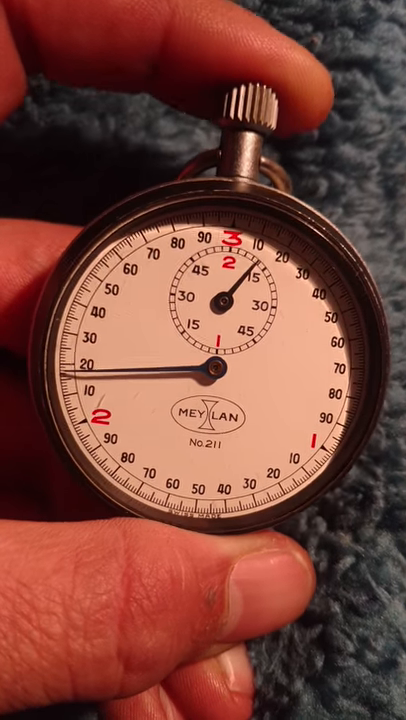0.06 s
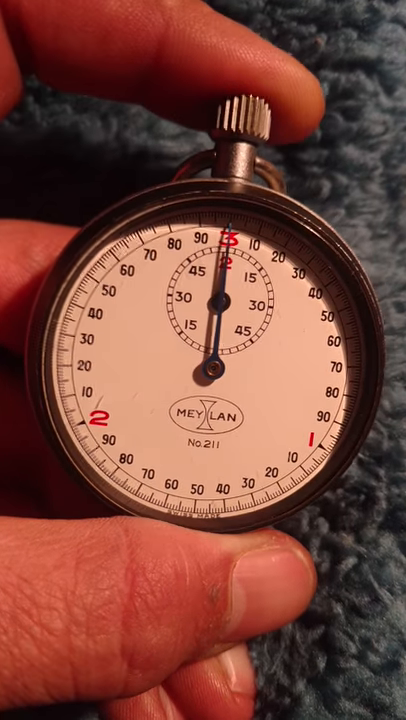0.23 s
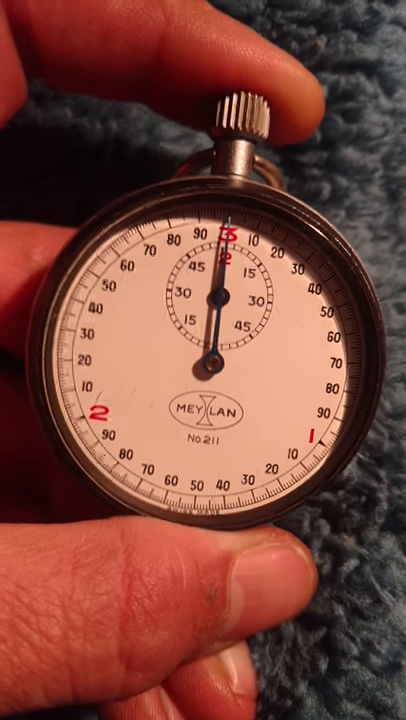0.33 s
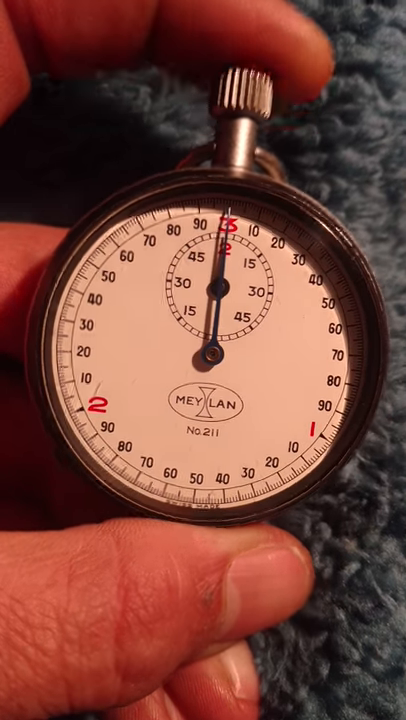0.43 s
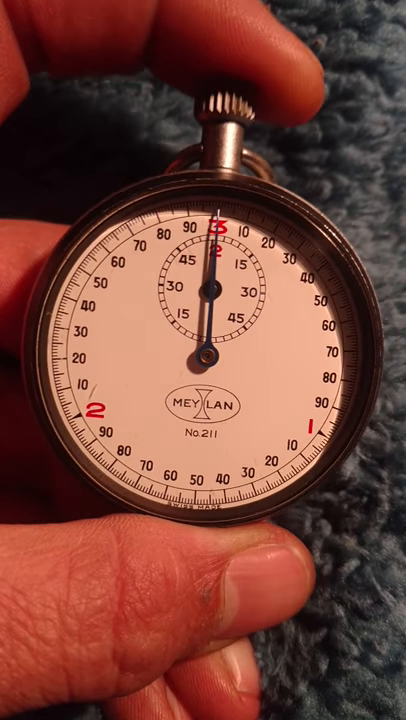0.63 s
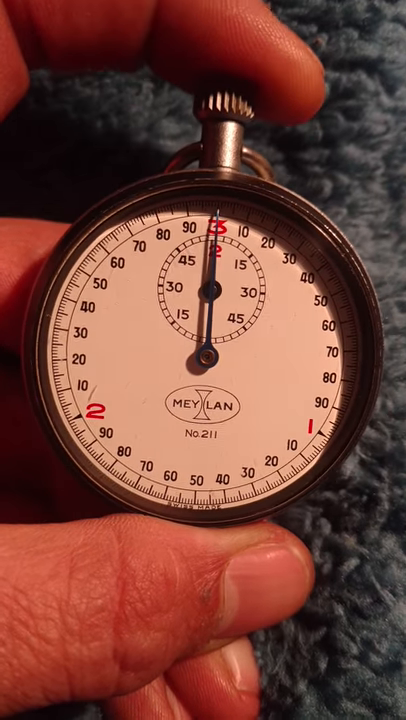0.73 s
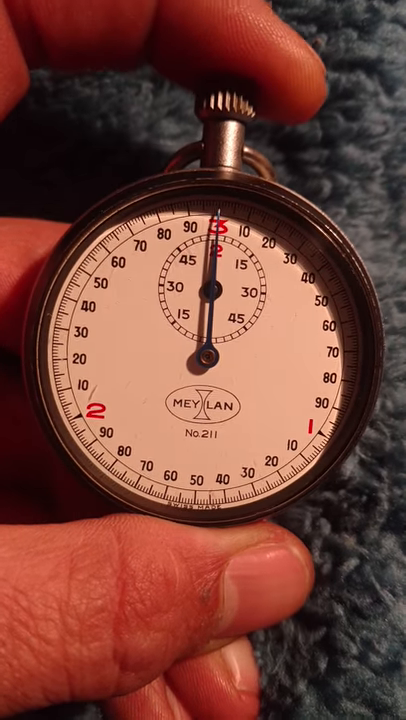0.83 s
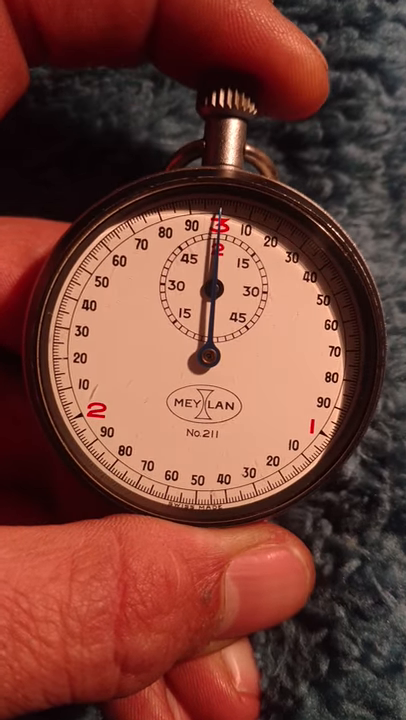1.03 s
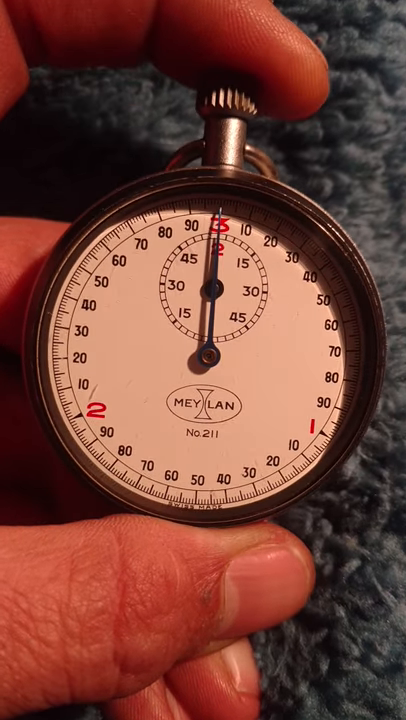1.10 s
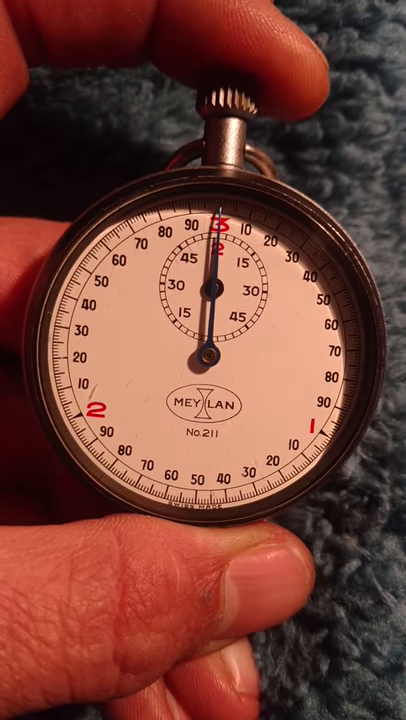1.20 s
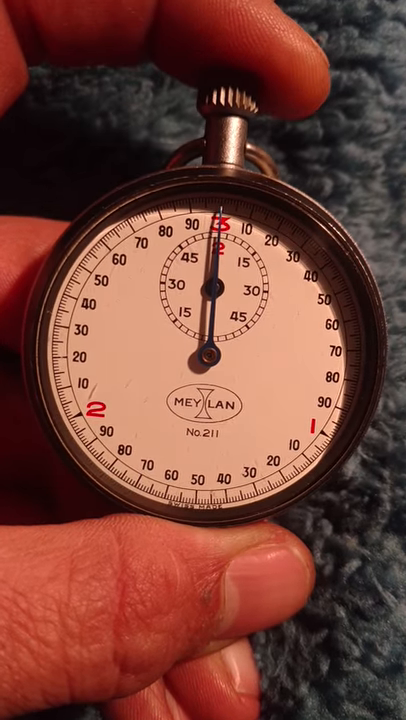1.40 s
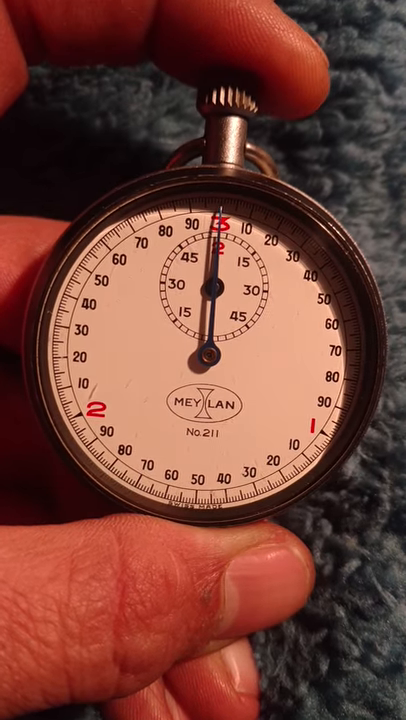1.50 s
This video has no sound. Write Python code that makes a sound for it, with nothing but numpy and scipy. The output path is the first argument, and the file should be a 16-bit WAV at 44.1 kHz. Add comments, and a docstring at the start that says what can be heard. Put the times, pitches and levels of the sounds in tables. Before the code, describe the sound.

A mechanical stopwatch resets with one sharp metallic snap, then two weaker clicks.

```python
"""Resetting a stopwatch

A fan runs in a small room. Close to a phone, a finger presses a stopwatch's crown, which takes up its
play; the hammer snaps the hands to zero, then the crown and its lever click back. Each impact excites
the damped normal modes of the steel case. The snap pulls the phone's automatic gain down, and the
room tone creeps back up."""
import sys
import numpy as np
from scipy import signal
from scipy.fft import rfft, irfft
from scipy.io import wavfile
from scipy.ndimage import uniform_filter1d

SR = 44100
rng = np.random.default_rng(int(sys.argv[2]) if len(sys.argv) > 2 else 0)


def dump_mix(stems):
    """Bounce the given channels to the path in sys.argv[1] as a 16-bit WAV at rate SR."""
    frames = np.atleast_2d(stems).T  # one column per channel
    limited = np.clip(frames, -1, 1)  # hard clip at full scale
    pcm = np.round(limited * 32767).astype(np.int16)
    wavfile.write(sys.argv[1], SR, pcm)


N = 68355
FREQS = np.fft.rfftfreq(N, 1 / SR)


def undb(db):
    """Amplitude ratio of a level in decibels."""
    return 10 ** (np.asarray(db) / 20)


def curve(points):
    """Magnitude response through (f/Hz, level/dB) points, interpolated in log frequency."""
    hz, db = np.array(points, float).T
    return undb(np.interp(np.log(FREQS + 1), np.log(hz), db))


def tint(x, points):
    """Zero-phase filtering by a magnitude response."""
    return irfft(rfft(x) * curve(points), N)


def unit(x):
    """Normalisation to unit rms."""
    return x / np.sqrt(np.mean(x ** 2))


def noise(spectrum):
    """Spectrally shaped Gaussian noise of unit rms."""
    return unit(tint(rng.standard_normal(N), spectrum))


def decay(age, t60):
    """Exponential damping from age 0, by 60 dB in t60 seconds."""
    return (age >= 0) * np.exp(-np.log(1000) * np.maximum(age, 0) / t60)


def widen(x, share=0.61, delay_s=0.000389, corner_hz=1410):
    """Antiphase crossfeed: each channel loses a delayed copy of the other's treble."""
    highpass = 1 - np.exp(-(FREQS / corner_hz) ** 2)
    crossfeed = share * np.exp(-2j * np.pi * FREQS * delay_s) * highpass
    return x - irfft(rfft(x[::-1]) * crossfeed, N)


def diffuse(spectrum, side_gain):
    """Partial coherence: independent mid and side noises form a widened stereo pair."""
    mid, side = (irfft(rfft(noise(spectrum)) * gain / np.hypot(1, side_gain), N)
                 for gain in (1, side_gain))
    return unit(widen(np.array([mid + side, mid - side])))


# Airflow spectrum: f/Hz, relative level/dB
AIR_SPECTRUM = [(25, -30.5), (65, -13), (110, -6), (200, -1), (350, -6.5), (620, -6), (790, 1), (900, -4),
                (1080, -1.5), (1400, -11.5), (1750, -6), (2400, -20), (3500, -25.5), (7000, -31),
                (15000, -43.5)]
# Side-to-mid ratio of the airflow: f/Hz, level/dB
AIR_SIDE_RATIO = [(40, 5), (110, 0), (400, -7), (700, -11.5), (1200, -18.5), (1700, 6.5), (3000, 1.5)]
# Blade tones: harmonic number, rms level/dB
BLADE_HARMONICS = [(1, -66.5), (2, -71.5), (3, -73.5), (4, -66), (5, -61.5), (6, -69.5), (7, -75),
                   (8, -67.5), (10, -67)]

def fan(t, blade_hz=98, waver_depth=0.002, mains_hz=120.3):
    """Harmonics of a wavering blade-passing frequency add to mains hum and broadband airflow noise."""
    waver = unit(irfft(rfft(rng.standard_normal(N)) * np.exp(-FREQS / 5), N))
    cycles = np.cumsum(blade_hz * (1 + waver_depth * waver)) / SR
    blades = sum(undb(db) * np.sin(2 * np.pi * (k * cycles + rng.random())) for k, db in BLADE_HARMONICS)
    hum = undb(-62.5) * np.sin(2 * np.pi * mains_hz * t)
    air = undb(-51) * diffuse(AIR_SPECTRUM, curve(AIR_SIDE_RATIO))
    return np.sqrt(2) * (blades + hum) + air


# Skin friction spectrum: f/Hz, relative level/dB
RUB_SPECTRUM = [(3000, -16), (7000, -1), (10000, 5), (12500, -7), (14000, -1), (15500, -25)]
# Handling rumble spectrum: f/Hz, relative level/dB
RUMBLE_SPECTRUM = [(25, 5), (55, 11), (90, 9), (200, -25), (600, -52)]

def finger(t, press_s=0.067, press_width_s=0.067, release_s=0.465):
    """Friction of skin on the knurled crown hisses faintly; letting go sets off a damped rumble."""
    rumble = decay(t - release_s, t60=0.18) * np.array([noise(RUMBLE_SPECTRUM) for _ in range(2)])
    pressure = np.exp(-((t - press_s) / press_width_s) ** 2)
    rub = pressure * diffuse(RUB_SPECTRUM, side_gain=0.76)
    return undb(-72) * rub + undb(-55.5) * rumble


# Modes of case and movement: f/Hz, level/dB when struck by hammer, by crown, by lever, T60/s
CASE_MODES = [(519, -14.5, -21, -23, 0.0065), (1301, -21, -29, -18, 0.0073), (2079, -6.5, -6, -19, 0.0021),
              (2950, -25, -4, -12, .0098), (3064, -11.5, -5, -12, 0.021), (3495, 8.5, 2, 4.5, 0.008),
              (3668, 2.5, -13.5, -10.4, .0036), (4463, -21.5, -31, -20, .0067),
              (4790, -12.5, -4, -12, 0.013), (5630, -16.5, -6.5, -3, 0.002), (6230, 1, -3, -.5, .0113),
              (7377, -3, -6.5, -16, .0195), (8430, -1.5, -9, 0, .0038), (9914, -1, 2.5, -5, .0071),
              (10642, -23.5, -6.5, -7.5, 0.0057), (11120, -21, -19.8, -15, .016),
              (11870, -4.5, -4, -12, 0.004), (13025, -20, -18, -22, 0.011), (15200, -3, -6, -10, 0.0035)]
# Filter colouring the contact noise: f/Hz, level/dB
CRACK_RESPONSE = [(100, -37), (300, -14.5), (650, -2.5), (1200, -7.5), (2100, 14), (4000, -0.5),
                  (5000, -14), (7000, 1), (11500, 4.5), (13300, -9.5), (15000, -10), (16000, -30.5)]

def impacts(t, contacts, striker):
    """Modal superposition: each contact excites damped sinusoids and a brief crack of noise."""
    out = np.zeros(N)
    column = ("hammer", "crown", "lever").index(striker)
    for start, low_db, mid_db, high_db in contacts:
        age = t - start
        for k, (hz, *mode_dbs, t60) in enumerate(CASE_MODES):
            band_db = low_db if hz < 4000 else mid_db if hz < 8000 else high_db
            amplitude = (-1) ** k * undb(mode_dbs[column] + band_db)
            out += amplitude * np.sin(2 * np.pi * hz * age) * decay(age, t60)
        crack = rng.standard_normal(N) * decay(age, t60=0.022)
        out += undb(high_db - 22) * tint(crack, CRACK_RESPONSE)
    return out


# Rattle onsets: t/s, level/dB
RATTLE_ONSETS = [(0.236, -40.5), (0.480, -44.5)]
# Rattle spectrum: f/Hz, relative level/dB
RATTLE_SPECTRUM = [(1500, -25), (2900, -18.5), (3280, -5), (3500, 1), (3800, -12), (5000, -19.5),
                   (6300, -14.5), (8000, -28.5), (15000, -38.5)]

def rattle(t):
    """Free vibration of springs and loose parts: decaying noise around the main resonance."""
    return sum(undb(db) * decay(t - start, t60=0.14) * noise(RATTLE_SPECTRUM)
               for start, db in RATTLE_ONSETS)


# Contacts: t/s, level/dB below 4 kHz, at 4-8 kHz, above 8 kHz (the last also drives the crack)
CROWN_CONTACTS = [(0.1776, -44, -53, -61), (0.4781, -17, -15, -24.5), (0.4802, -34, -20, -33)]  # takes up its play, later springs back and bounces once
HAMMER_CONTACTS = [(0.23346, -19.5, -24.6, -24), (0.23434, -15.5, -8, -11.5), (0.23468, -24, -24, -6.5),
                   (0.23508, 3, -1.27, 0.5)]  # touches, slides and seats on the cams
LEVER_CONTACTS = [(0.7356, -35, -30.4, -43)]  # drops back

def stopwatch(t, radiation_hz=480):
    """Radiation from a small body: all contacts drive one case, which radiates bass poorly."""
    vibration = (impacts(t, HAMMER_CONTACTS, "hammer") + impacts(t, CROWN_CONTACTS, "crown")
                 + impacts(t, LEVER_CONTACTS, "lever") + rattle(t))
    return signal.sosfilt(signal.butter(2, radiation_hz, "high", fs=SR, output="sos"), vibration)


# Further colouring of the right channel: f/Hz, level/dB
SHADOW_RESPONSE = [(4000, 3.5), (6500, 1.5), (8000, -4), (12000, -3.5), (15000, -2)]

def microphones(x, far_db=-22.5, lag_s=0.00012):
    """Acoustic shadowing: the right microphone faces away, so its signal is weaker, later and duller."""
    delayed = irfft(rfft(x) * np.exp(-2j * np.pi * FREQS * lag_s), N)
    left, right = widen(np.array([x, undb(far_db) * delayed]))
    return np.array([left, tint(right, SHADOW_RESPONSE)])


def room(x, t, delay_s=0.0026):
    """Reverberation: convolution with an impulse response of decaying noise."""
    response = np.zeros((2, N))
    for db, t60 in ((-21.5, 0.036), (-34.5, 0.17)):  # reflections from hand and phone, then the walls
        tail = rng.standard_normal((2, N)) * decay(t - delay_s, t60)
        response += undb(db) * tail / np.linalg.norm(tail, axis=1, keepdims=True)
    return signal.fftconvolve(x, response, axes=1)[:, :N]


def scene():
    """Linear superposition of the clicks, their reflections, the finger and the fan."""
    t = np.arange(N) / SR
    clicks = microphones(stopwatch(t))
    return clicks + widen(room(clicks, t)) + finger(t) + fan(t)


def automatic_gain(x, threshold_db=-4, recovery_db_per_s=10, initial_cut_db=3):
    """Peak limiting: the gain falls just ahead of a peak and recovers linearly in decibels."""
    ahead, attack = int(0.0035 * SR), int(0.0018 * SR)
    peak_db = 20 * np.log10(np.abs(x).max(axis=0) + 1e-9)
    excess_db = np.maximum(peak_db - threshold_db, 0)
    excess_db = np.pad(excess_db[ahead:], (0, ahead))
    recovery_db = recovery_db_per_s * np.arange(N) / SR
    held_db = np.maximum.accumulate(excess_db + recovery_db)
    cut_db = np.maximum(held_db, initial_cut_db) - recovery_db
    return undb(-uniform_filter1d(cut_db, attack))


# Microphone self-noise spectrum: f/Hz, relative level/dB
HISS_SPECTRUM = [(100, -2), (3000, 6), (7000, -1), (12000, -8), (14500, -14.5), (15700, -32.5)]

def record(dry, cutoff_hz=16100):
    """The phone's signal chain: gain control, a steady noise floor and band limiting."""
    hiss = undb(-73) * diffuse(HISS_SPECTRUM, side_gain=0.97)
    lowpass = signal.ellip(8, 0.2, 70, cutoff_hz, fs=SR, output="sos")
    return signal.sosfilt(lowpass, dry * automatic_gain(dry) + hiss)


dry = scene()
out = record(dry)
dump_mix(out)
```